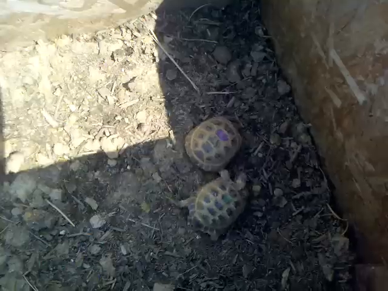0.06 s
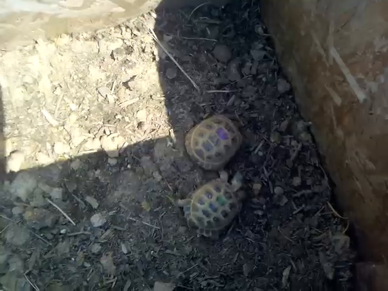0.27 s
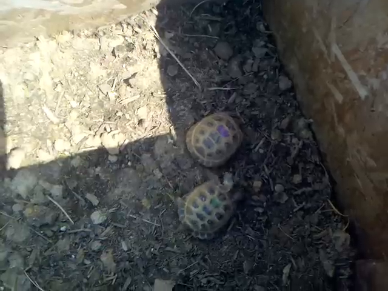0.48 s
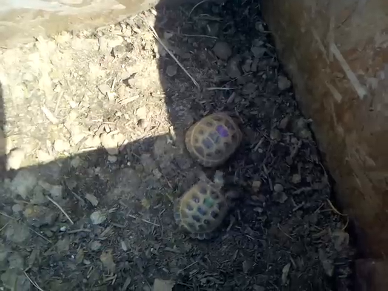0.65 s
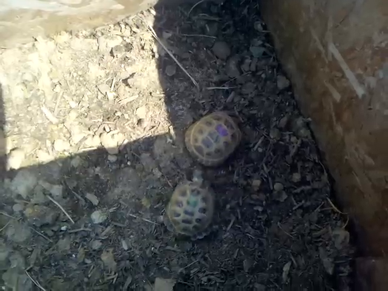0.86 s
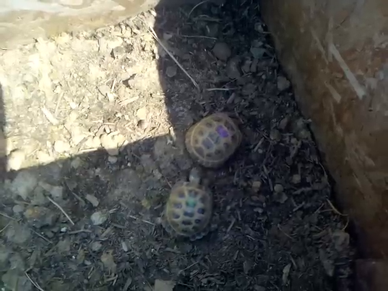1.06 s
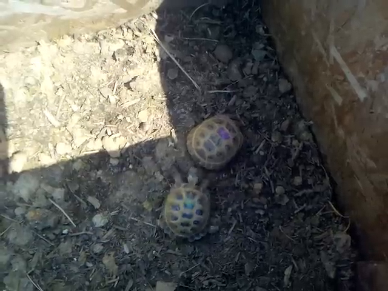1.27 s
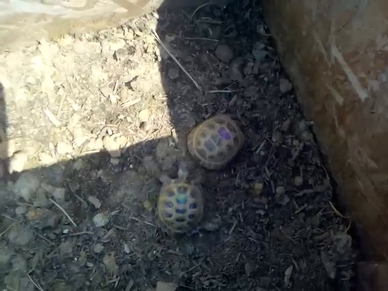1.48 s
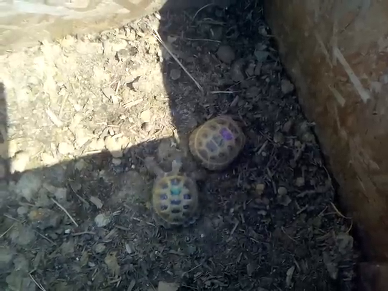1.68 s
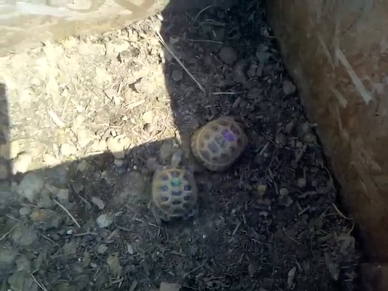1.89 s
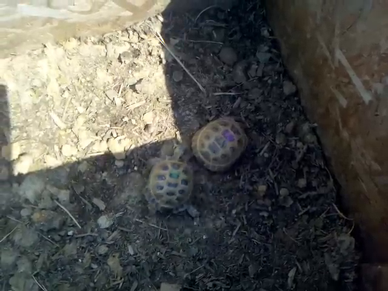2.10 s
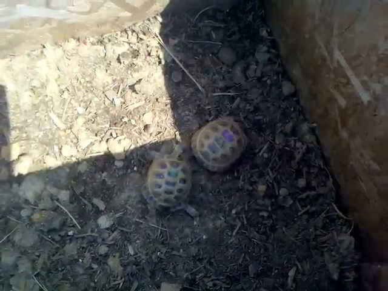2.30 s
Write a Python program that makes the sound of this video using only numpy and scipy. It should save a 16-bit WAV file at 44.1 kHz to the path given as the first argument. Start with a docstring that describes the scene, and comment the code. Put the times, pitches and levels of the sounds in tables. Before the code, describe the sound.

Dull knocks and low rubbing come from a hand shifting on a camera, loudest from 0.2 to 0.5 seconds. A second cluster follows from 1.1 to 1.5 seconds, and a smaller bump near 2.2. Tortoises faintly tick and scuff dry soil, mostly in the first second and around 2 seconds. Two barely audible, distant bird notes sound near 1.2 and 1.6 seconds, over quiet outdoor air and steady hiss.

```python
"""Dull knocks over a low, grainy rubbing: a grip shifts in tiny slips on a hand-held camera.
Each stick-slip release pushes the casing, which answers with a heavily damped swing.
Below, two tortoises in a pen of dry soil faintly scuff and tick the litter with their claws.
Two far bird notes sound through quiet outdoor air and microphone hiss.
The microphone cuts the bass and notches the treble; a gain control ducks the loudest knocks."""
import sys
import numpy as np
from scipy.fft import rfft, irfft, next_fast_len
from scipy.io import wavfile
from scipy.ndimage import uniform_filter1d, map_coordinates

SR = 44100
rng = np.random.default_rng(int(sys.argv[2]) if len(sys.argv) > 2 else 0)


def waveform_to_disk(signal):
    """Save audio, clipped to [-1, 1], as 16-bit WAV at the path in sys.argv[1]."""
    frames = np.transpose(np.atleast_2d(signal))
    scaled = np.clip(frames, -1, 1) * 32767
    samples = np.round(scaled).astype(np.int16)
    wavfile.write(sys.argv[1], SR, samples)


N = 108045

# Spectrum of the outdoor air: frequency_hz, gain_db
AIR_SPECTRUM = [(25, -19), (60, -7), (110, 1.5), (300, -3.5), (650, -1), (1200, -6.5), (2200, -12),
                (4500, -17), (9000, -46)]
# Spectrum of the microphone hiss: frequency_hz, gain_db
HISS_SPECTRUM = [(1000, -28.5), (4500, -20), (8000, -6), (11000, 2), (12500, -6), (14200, 0), (16000, -3)]
# Far bird notes: start_s, length_s, start_hz, end_hz, level_db
BIRD_NOTES = [(1.182, .075, 3030, 2760, -71), (1.616, 0.039, 2700, 2980, -74)]
# Spectrum of the dry litter: frequency_hz, gain_db
LITTER_SPECTRUM = [(1000, -11), (2000, -5), (3000, -12), (4500, -13), (6000, -16), (8000, -4.5), (11000, 8),
                   (14000, -3.5), (16000, -2.5)]
# Claws dragging through litter: centre_s, half_length_s, level_db
CLAW_SCUFFS = [(0.061, 0.0083, -61.5), (0.11, 0.15, -67), (0.758, 0.022, -62), (0.919, 0.045, -58.5),
               (1.7, 0.24, -68.5), (1.977, 0.033, -56.5), (2.122, 0.038, -56.5), (2.444, .012, -63.5)]
# Dry bits snapping: start_s, level_db, pitch_hz
LITTER_SNAPS = [(.0443, -47, 11300), (.098, -55, 11000), (.2418, -49, 14200), (.4429, -47, 13300),
                (.5661, -49.5, 9300), (1.737, -53, 11300)]
# Response of the casing: frequency_hz, gain_db
CASING_SPECTRUM = [(60, -39), (130, 1), (400, 1), (700, -8.5), (1100, -15.5), (2000, -32), (4000, -60),
                   (8000, -100)]
# Envelope of the rubbing grip: time_s, level_db
GRIP_ENVELOPE = [(0, -53), (.08, -66), (.135, -53), (0.179, -55), (0.207, -35), (0.244, -33), (.267, -27.5),
                 (.29, -37.5), (.335, -46), (.42, -41), (0.512, -49.5), (.54, -65), (0.596, -51.5),
                 (.64, -61), (.705, -55), (.765, -68.5), (.83, -48.5), (.91, -51.5), (.97, -71),
                 (1.035, -57), (1.11, -58), (1.141, -40), (1.2, -47), (1.299, -51), (1.359, -44.5),
                 (1.486, -51.5), (1.51, -73), (1.81, -75), (1.86, -61.5), (2.07, -65.5), (2.16, -55),
                 (2.22, -67), (2.45, -81)]
# Knocks on the casing: centre_s, peak_db, pitch_hz
CASING_KNOCKS = [(.110, -47, 200), (0.136, -39, 170), (.202, -30, 336), (0.211, -20, 556),
                 (0.2174, -25, 303), (0.2227, -22.5, 465), (0.233, -17.5, 667), (0.2354, -18, 385),
                 (.243, -22.5, 380), (.2542, -14.5, 372), (0.2585, -20, 456), (.2642, -13, 380),
                 (.270, -26, 750), (0.2751, -19.5, 530), (0.2934, -27, 298), (.304, -29, 280),
                 (0.3592, -28, 287), (0.3677, -28.5, 503), (.380, -27, 293), (.384, -26.5, 250),
                 (0.4187, -22.5, 335), (0.4284, -25.5, 246), (.455, -35, 210), (0.4723, -33, 229),
                 (0.6016, -37.5, 210), (0.806, -42, 198), (0.8324, -34, 220), (1.037, -45, 218),
                 (1.087, -45.5, 200), (1.1358, -19.5, 313), (1.1366, -41, 1410), (1.146, -34.5, 445),
                 (1.154, -22.5, 246), (1.174, -43, 850), (1.177, -28, 260), (1.2068, -35, 196),
                 (1.2624, -35.5, 197), (1.351, -30, 340), (1.354, -29.5, 216), (1.372, -34, 285),
                 (1.4028, -34.5, 265), (1.484, -42, 212), (1.882, -48, 198), (2.015, -51, 200),
                 (2.1402, -37, 230), (2.1829, -38, 225), (2.1982, -26, 340), (2.311, -50, 262)]

AIR_DB, HISS_DB, HISS_WAVER_DB = -63.5, -61.5, 0.9
BIRD_FLUTTER_DB = 7
SCUFF_SPREAD_DB, GRIT_DB, GRIT_SPREAD_DB = 3.4, -76, 5
SNAP_T60_S, SNAP_WIDTH_HZ = 0.024, 2200
SLIPS_PER_S, SLIP_HZ, SLIP_LOG_SPREAD, SLIP_SCATTER_DB = 300, 175, 0.32, 2
FIRM_DB, OCTAVES_PER_DB = -53, 0.01  # above this level a firmer grip raises the pitch of the slips
SLIP_CYCLES, KNOCK_CYCLES = 0.9, 0.67  # half widths of the pulses
RASP_DB, RING_DB, RING_T60_S = -13, -20.5, 0.044  # levels relative to the slips and to the knock
BASS_CUT_HZ, NOTCH_SPACING_HZ, TOP_HZ = 78.6, 3155, 15600
DUCK_THRESHOLD_DB, MAX_DUCK_DB, RECOVERY_DB_PER_S = -28.5, 4, 1.64


def amp(db):
    """Amplitude ratio of a level in decibels."""
    return 10 ** (np.asarray(db) / 20)


def unit(x):
    """Normalisation to an rms of 1."""
    return x / np.sqrt(np.mean(x ** 2) + 1e-20)


def clock():
    """Uniform sampling: the time of every sample in seconds."""
    return np.arange(N) / SR


def filtered(x, response):
    """Linear filtering: the spectrum of x times a frequency response."""
    padded = next_fast_len(N + 8192)
    hz = np.fft.rfftfreq(padded, 1 / SR)
    return irfft(rfft(x, padded) * response(hz), padded)[:N]


def noise(spectrum, envelope=1):
    """Spectral shaping: white noise follows the envelope, then is coloured at equal power."""
    points_hz, db = np.transpose(spectrum)
    white = envelope * rng.standard_normal(N)
    return filtered(white, lambda hz: unit(amp(np.interp(np.log(hz + 1), np.log(points_hz), db))))


def wobble(rate):
    """Random modulation: a smooth curve through rate knots a second."""
    knots = rng.standard_normal(int(N * rate / SR) + 4)
    return map_coordinates(knots, [clock() * rate])


def decays(onsets, t60):
    """Exponential decay: each onset (start_s, level_db) falls 60 dB in t60 seconds."""
    t = clock()
    return sum(amp(db) * (t >= s) * np.exp(-np.log(1000) * np.abs(t - s) / t60) for s, db in onsets)


def background():
    """Broadband noise floor: quiet outdoor air and a bright, slightly wavering hiss."""
    air = amp(AIR_DB) * noise(AIR_SPECTRUM)
    hiss = amp(HISS_DB + HISS_WAVER_DB * wobble(42)) * noise(HISS_SPECTRUM)
    return air + hiss


def bird():
    """Frequency glides make two thin, far notes; amplitude modulation makes them flutter."""
    notes = np.zeros(N)
    for start_s, length_s, start_hz, end_hz, db in BIRD_NOTES:
        progress = np.clip((clock() - start_s) / length_s, 0, 1)
        hz = start_hz + (end_hz - start_hz) * progress
        notes += amp(db) * np.sin(np.pi * progress) * np.sin(2 * np.pi * np.cumsum(hz) / SR)
    return notes * amp(BIRD_FLUTTER_DB * wobble(200))


def claws():
    """Sliding friction: claws raise grainy swells of noise over a faint crackle of soil."""
    drag = sum(amp(db) * np.exp(-((clock() - s) / half) ** 2) for s, half, db in CLAW_SCUFFS)
    scuffs = drag * amp(SCUFF_SPREAD_DB * wobble(400))
    grit = amp(GRIT_DB + GRIT_SPREAD_DB * wobble(120))
    return noise(LITTER_SPECTRUM, scuffs + grit)


def snaps():
    """Brittle fracture: each dry bit releases a noise burst in its own band of the treble."""
    ticks = np.zeros(N)
    for start_s, db, pitch_hz in LITTER_SNAPS:
        burst = decays([(start_s, db)], SNAP_T60_S) * rng.standard_normal(N)
        ticks += filtered(burst, lambda hz: unit(np.exp(-((hz - pitch_hz) / SNAP_WIDTH_HZ) ** 2 / 2)))
    return ticks


def pushes(times, gains, hz, half_cycles, reach=1400):
    """Heavy damping: each soft push on the casing gives one main swing between smaller ones."""
    samples = np.round(times * SR).astype(int)[:, None] + np.arange(-reach, reach)
    cycles = (samples / SR - times[:, None]) * hz[:, None]
    envelope = np.hanning(2 * reach) / np.cosh(cycles / half_cycles * np.pi / 2) ** 2
    swing = -gains[:, None] * np.cos(2 * np.pi * cycles) * envelope
    inside = (samples >= 0) & (samples < N)
    return np.bincount(samples[inside], swing[inside], N)


def rubbing():
    """Stick-slip friction: dense slips over a fine rasp, louder and higher when the grip is firm."""
    count = int(SLIPS_PER_S * N / SR)
    jitter, pitch, strength = rng.standard_normal((count, 3)).T
    times = (np.arange(count) + jitter) / SLIPS_PER_S
    grip_s, grip_db = np.transpose(GRIP_ENVELOPE)
    firmness_db = np.maximum(np.interp(times, grip_s, grip_db) - FIRM_DB, 0)
    hz = SLIP_HZ * np.exp(SLIP_LOG_SPREAD * np.clip(pitch, -2, 2))
    hz *= 2 ** (OCTAVES_PER_DB * firmness_db)
    gains = amp(SLIP_SCATTER_DB * strength) * rng.choice([-1, 1], count)
    slips = pushes(times, gains, hz, SLIP_CYCLES)
    envelope = amp(np.interp(clock(), grip_s, grip_db))
    rasp = amp(RASP_DB) * noise(CASING_SPECTRUM, envelope)
    return unit(slips) * envelope + rasp


def knocks():
    """Impulsive excitation: each larger slip of the grip thumps the casing and leaves a brief ring."""
    times, db, hz = np.transpose(CASING_KNOCKS)
    thumps = pushes(times, amp(db), hz, KNOCK_CYCLES)
    ring = amp(RING_DB) * noise(CASING_SPECTRUM, decays(zip(times, db), RING_T60_S))
    return thumps + ring


def microphone(hz):
    """Comb filtering notches the treble at even spacing; a fourth-order high-pass cuts the bass."""
    comb = np.where(hz < NOTCH_SPACING_HZ / 2, 1, np.abs(np.sin(np.pi * hz / NOTCH_SPACING_HZ)))
    high_pass = (hz / BASS_CUT_HZ) ** 4 / np.sqrt(1 + (hz / BASS_CUT_HZ) ** 8)
    return comb * high_pass


def gain_control(x, window=440):
    """Compression: the gain ducks fast when the short-term power passes a threshold, then creeps back."""
    level_db = 10 * np.log10(np.abs(uniform_filter1d(x ** 2, window)) + 1e-12)
    excess_db = np.clip(level_db - DUCK_THRESHOLD_DB, 0, MAX_DUCK_DB)
    recovery_db = RECOVERY_DB_PER_S * clock()
    cut_db = np.maximum.accumulate(excess_db + recovery_db) - recovery_db
    smooth_db = uniform_filter1d(uniform_filter1d(cut_db, window), window)
    return x * amp(-smooth_db)


def scene():
    """Superposition of handling, tortoises, bird and background in one channel."""
    return (knocks() + rubbing() + claws() + snaps() + bird() + background())[None]


def record(dry):
    """Stages in cascade: microphone response, gain control and band limit."""
    coloured = filtered(dry[0], microphone)
    return filtered(gain_control(coloured), lambda hz: hz < TOP_HZ)[None]


dry = scene()
out = record(dry)
waveform_to_disk(out)
```